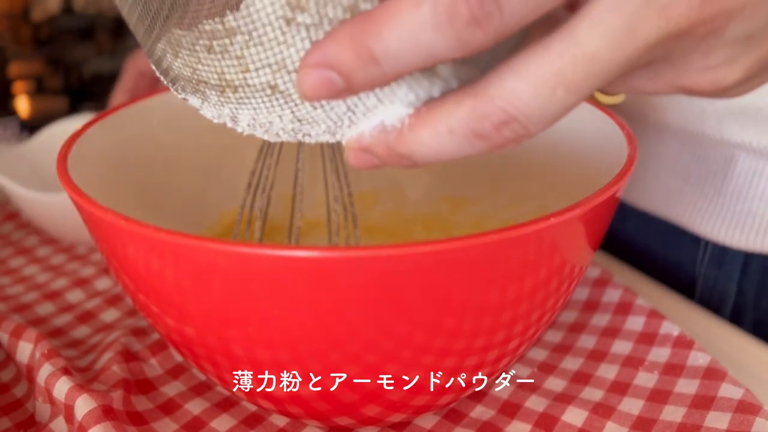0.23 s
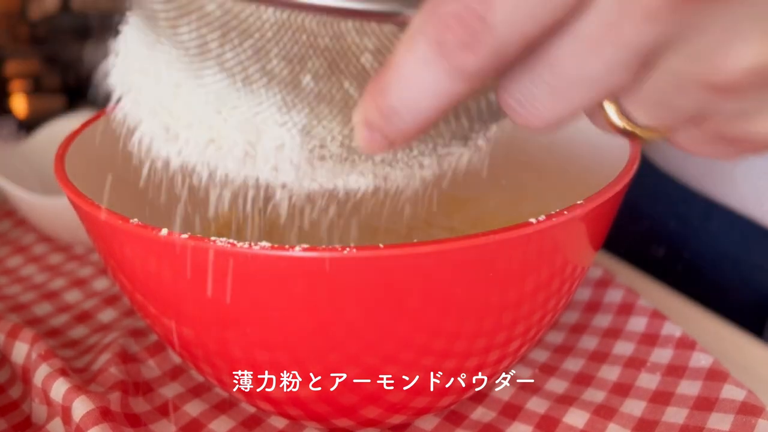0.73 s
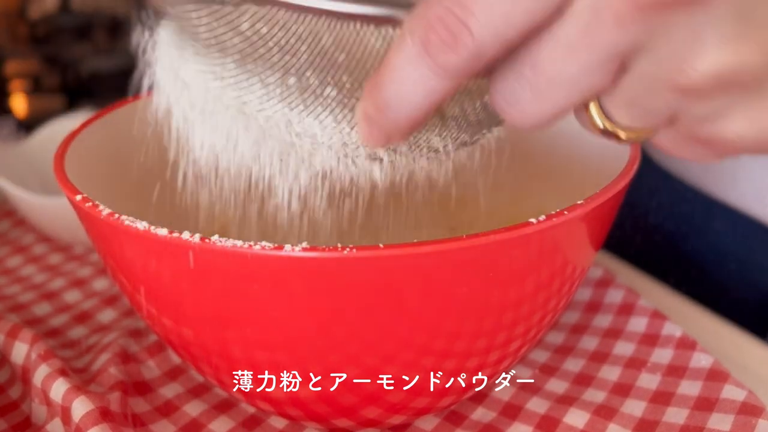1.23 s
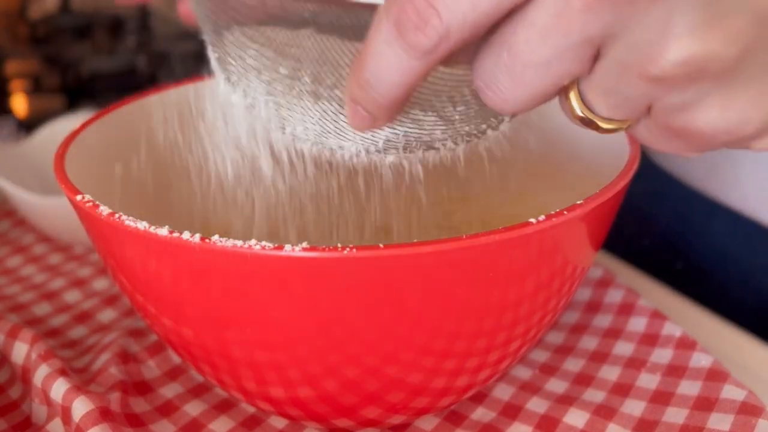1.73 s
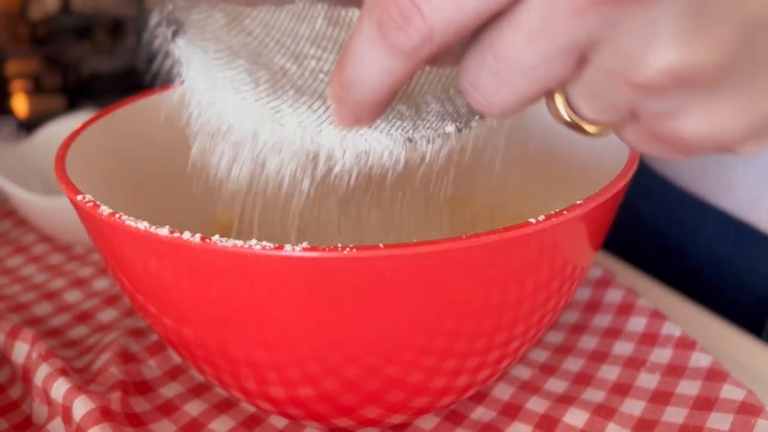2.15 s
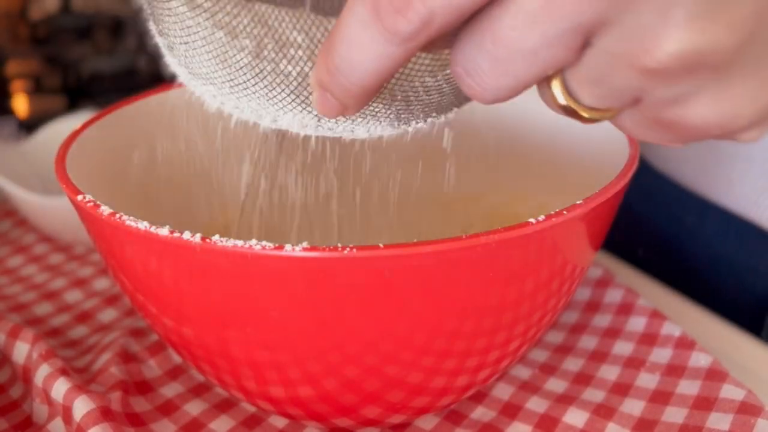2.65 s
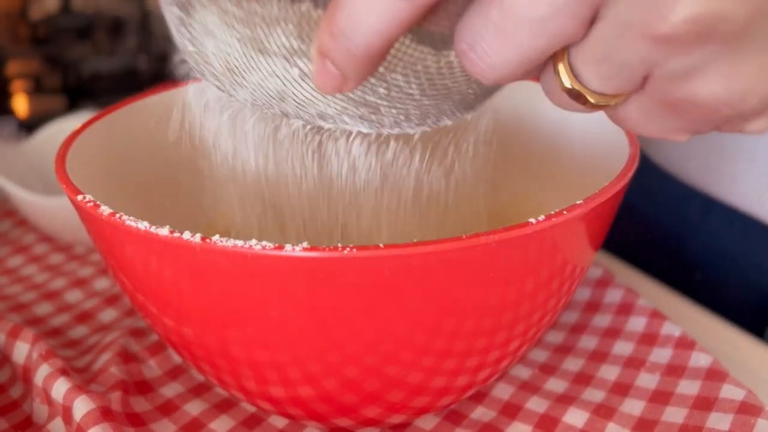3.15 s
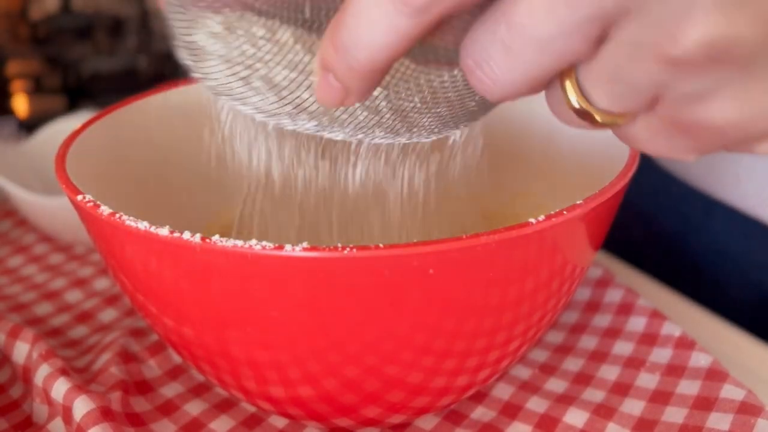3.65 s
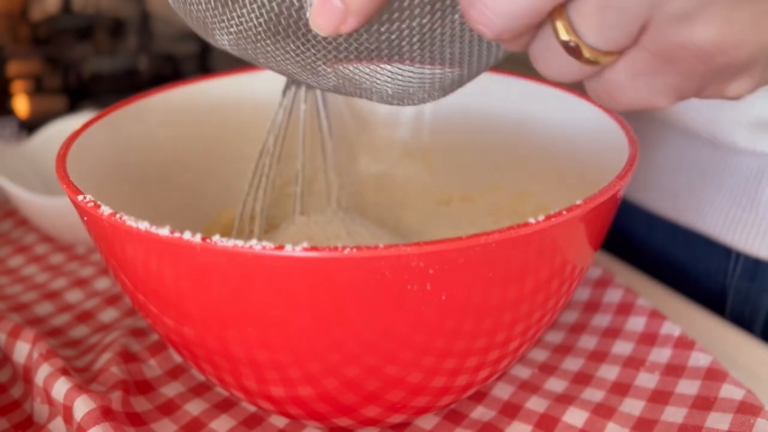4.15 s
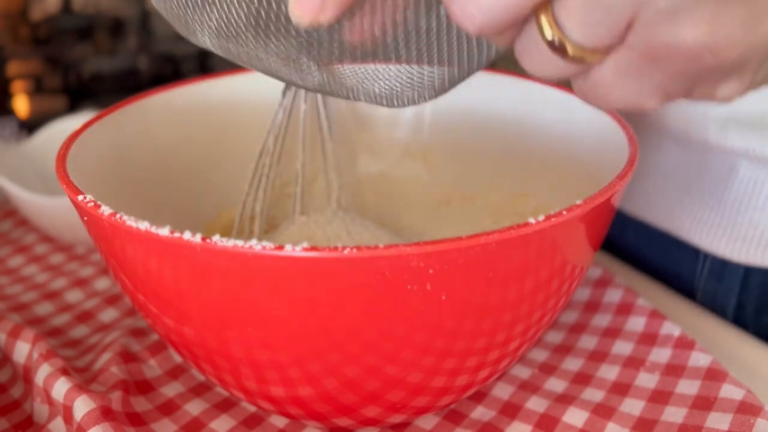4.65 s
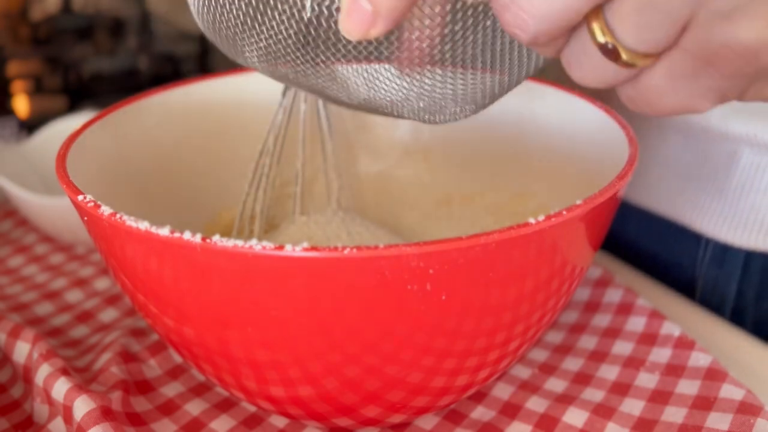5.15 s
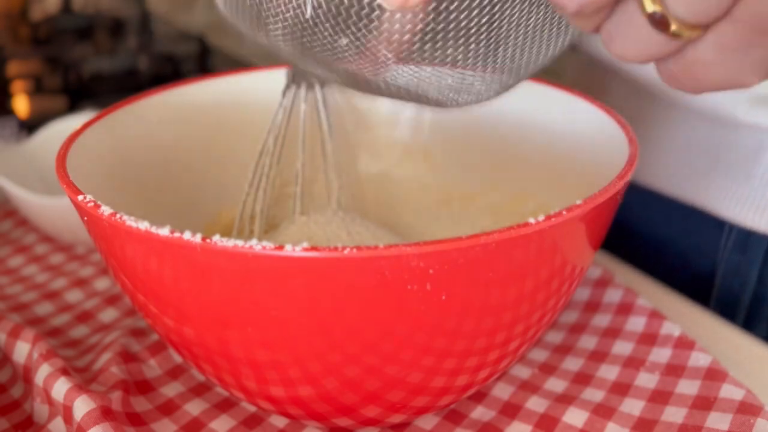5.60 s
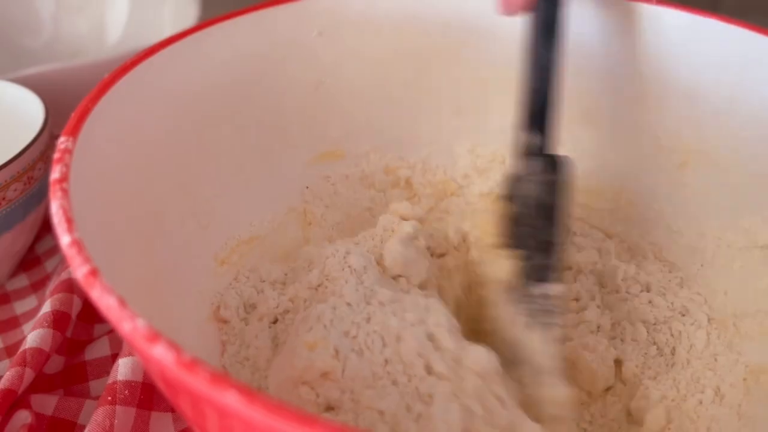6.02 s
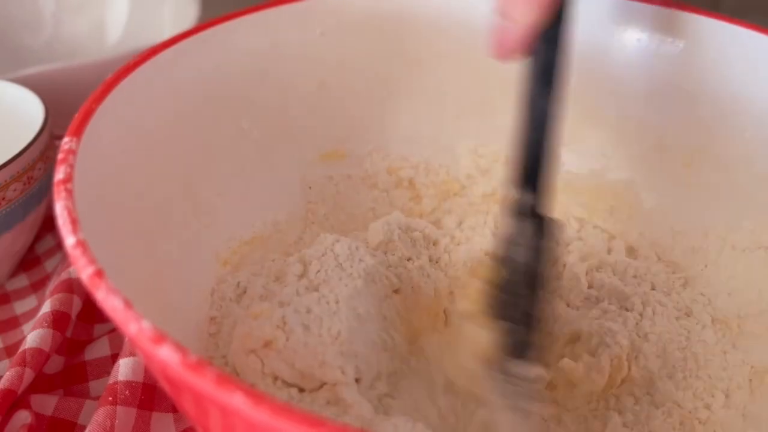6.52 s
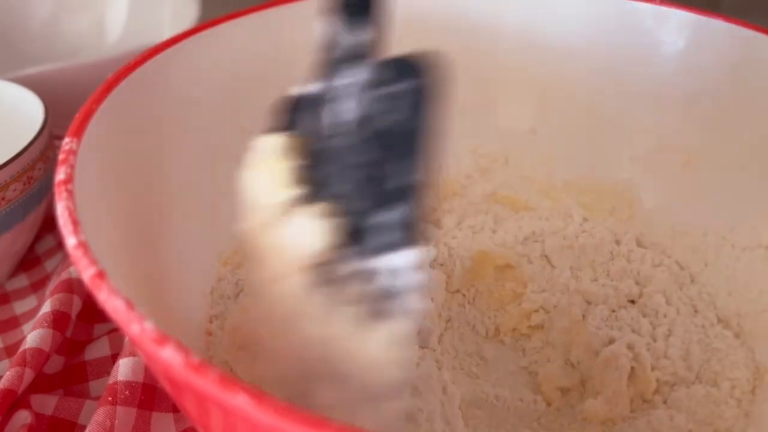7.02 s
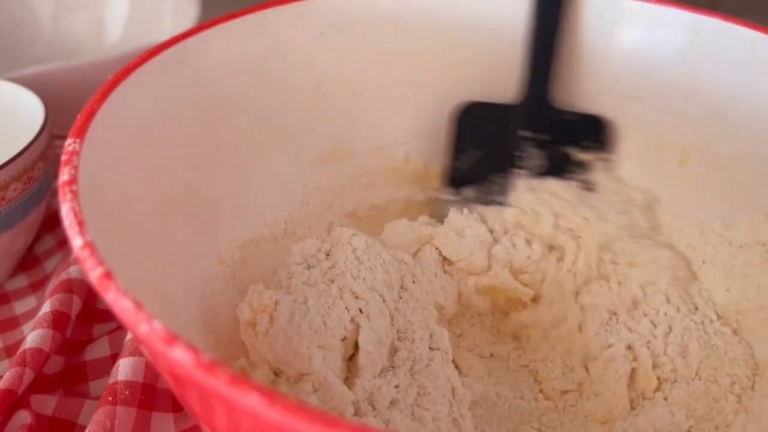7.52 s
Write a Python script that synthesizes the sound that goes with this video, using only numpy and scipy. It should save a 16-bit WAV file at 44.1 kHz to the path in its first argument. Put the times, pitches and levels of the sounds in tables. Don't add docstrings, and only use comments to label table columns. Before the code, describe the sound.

Close, fairly dry stereo sound in a home kitchen with faint motor hum. First a dull table thud, then quick regular sieve taps, crisp and papery with falling flour. The taps give way to sparse rubbing swishes, tiny ticks and increasingly hard metallic knocks. The scene then switches suddenly to a noisier one: a spatula pushes thick batter in soft thumping strokes, then scrapes long and gritty along the bowl.

```python
import sys
import numpy as np
from scipy import signal
from scipy.fft import rfft, irfft, next_fast_len
from scipy.io import wavfile
from scipy.ndimage import uniform_filter1d

SR = 44100
rng = np.random.default_rng(int(sys.argv[2]) if len(sys.argv) > 2 else 0)


def digitize_waveform(pressure):
    field = np.atleast_2d(pressure).T
    bounded = np.clip(field, -1, 1)
    quanta = np.round(bounded * 32767).astype(np.int16)
    wavfile.write(sys.argv[1], SR, quanta)


def convert_level_to_amplitude(level_db):
    exponent = np.asarray(level_db, float) / 20
    return 10 ** exponent


N = 342392
TIME = np.arange(N) / SR
SIZE = next_fast_len(N + SR // 4)
BINS_HZ = np.fft.rfftfreq(SIZE, 1 / SR)
EMPTIED_S, CUT_S = 4.27, 5.892


def rms_one(x):
    return x / np.sqrt(np.mean(x ** 2) + 1e-20)


def in_time(rows):
    s, *columns = np.transpose(rows)
    return [np.interp(TIME, s, c) for c in columns]


def at_bins(points):
    hz, value = np.transpose(points)
    return np.interp(np.log(BINS_HZ + 1), np.log(hz + 1), value)


def band_pass(x, order, low_hz, high_hz):
    return signal.sosfilt(signal.butter(order, [low_hz, high_hz], "band", fs=SR, output="sos"), x)


def grains(spectrum, spread_db):
    sizes = convert_level_to_amplitude(spread_db * np.minimum(rng.exponential(1, N), 5))
    noise = rng.standard_normal((2, N)) * sizes
    return rms_one(irfft(rfft(noise, SIZE) * convert_level_to_amplitude(at_bins(spectrum)), SIZE)[:, :N])


def drift(rate):
    knots = rng.standard_normal(1400)
    return np.interp(TIME * rate, np.arange(len(knots)), knots)


def tone(hz):
    return np.sin(2 * np.pi * np.cumsum(hz) / SR)


def ring(clicks, hz, t60):
    r, w = convert_level_to_amplitude(-60 / (t60 * SR)), 2 * np.pi * hz / SR
    return signal.lfilter([0, np.sin(w)], [1, -2 * r * np.cos(w), r * r], clicks + 1e-18)


def moving_resonance(x, centre_hz, width_hz):
    out, state, r = np.zeros_like(x), np.zeros((2, 2)), np.exp(-np.pi * width_hz / SR)
    for i in range(int(CUT_S * SR), N, 128):
        a = [1, -2 * r * np.cos(2 * np.pi * centre_hz[i] / SR), r * r]
        out[:, i:i + 128], state = signal.lfilter([1, 0, -1], a, x[:, i:i + 128], zi=state)
    return out / np.std(out[:, int(CUT_S * SR):])


def swells(rows):
    out = np.zeros(N)
    for s, ms, db in rows:
        near = slice(max(round((s - ms / 1000) * SR), 0), round((s + ms / 1000) * SR))
        out[near] += convert_level_to_amplitude(db) * np.exp(-.5 * ((TIME[near] - s) / (ms / 4000)) ** 2)
    return out


def evened(x):
    return x / np.sqrt(uniform_filter1d(np.mean(x ** 2, axis=0), size=160) + .1)


def kitchen(x, t60, wet_db, dull_hz):
    t = np.arange(int(.4 * SR)) / SR
    tails = rng.standard_normal((2, len(t))) * convert_level_to_amplitude(-60 * t / t60) * (t > .003)
    tails = band_pass(tails, 2, 70, dull_hz)
    wet = signal.fftconvolve(x[None], tails / np.sqrt(np.sum(tails[0] ** 2)), axes=1)[:, :N]
    return x * [[1], [0]] + convert_level_to_amplitude(wet_db) * wet


# [t/s, level/dB]
THROB = [(0.45, -58.5), (0.65, -55), (0.73, -68), (1.2, -56), (2.06, -71), (2.26, -51.5), (2.46, -61),
         (2.75, -49.5), (2.83, -65), (3.28, -52), (5.15, -64.5), (5.25, -54), (5.84, -65.5), (5.91, -52),
         (6.33, -45.5), (7.25, -53), (7.64, -46), (7.76, -52)]
# [f/Hz, level/dB per Hz]
DEEP_COLOUR = [(20, -47.5), (35, -15), (52, 37.5), (68, 41), (90, -49)]
UPPER_COLOUR = [(60, -13), (78, -17.5), (86, -9), (95, -2.5), (120, -8.5), (143, -4.5), (165, -10.5),
                (210, -15.5), (280, -15.5), (400, -52)]
DEEP_DB, DEEP_FOLLOWS, DEEP_WANDER_DB = -60, 0.2, 2.5
UPPER_DB, UPPER_FOLLOWS, RUMBLE_LATER_DB = -58, 0.11, 9
HUM_HZ, HUM_DB, HUM_FOLLOWS = 86.5, -59, 1.04


def rumble():
    throb_db = in_time(THROB)[0] + 58
    step_db = RUMBLE_LATER_DB * (TIME > CUT_S)
    deep_db = DEEP_DB + step_db + DEEP_FOLLOWS * throb_db + DEEP_WANDER_DB * drift(6)
    upper_db = UPPER_DB + step_db + UPPER_FOLLOWS * throb_db
    deep = convert_level_to_amplitude(deep_db) * grains(DEEP_COLOUR, spread_db=-6.5)
    upper = convert_level_to_amplitude(upper_db) * grains(UPPER_COLOUR, spread_db=-1.0)
    hum_hz = HUM_HZ + 1.2 * drift(5)
    hum_db = HUM_DB + 3.0 + HUM_FOLLOWS * throb_db + 1.6 * drift(4.9)
    return deep + upper + convert_level_to_amplitude(hum_db) * tone(hum_hz) * [[1], [0]]


# [f/Hz, level/dB per Hz]
AIR_COLOUR = [(200, 1.5), (350, 4.5), (500, -0.5), (1000, -1), (1720, -7), (1950, -12), (3900, -20.5),
              (5500, -32), (6500, -65), (7800, -18), (9500, -25.5), (11500, -19.5), (13000, -21),
              (15500, -43)]
AIR_DB, AIR_LATER_DB = -64, -56


def air():
    level_db = np.where(TIME < CUT_S, AIR_DB, AIR_LATER_DB) + 0.2 * drift(3.1)
    return convert_level_to_amplitude(level_db) * grains(AIR_COLOUR, spread_db=3.0)


# [t/s, level/dB]
FAR_SQUEAL = [
    (2.73, -105),
    (2.79, -84.5),
    (3.275, -84.5),
    (3.29, -92),
    (3.75, -93),
    (4.02, -96),
    (4.05, -110),
]
SQUEAL_HZ = 3195


def squeal():
    (level_db,) = in_time(FAR_SQUEAL)
    waver_hz, flicker_db = 30 * drift(170), 3.6 * drift(70)
    return convert_level_to_amplitude(level_db + 9.0 + flicker_db) * tone(SQUEAL_HZ + waver_hz)


def background():
    return rumble() + air() + squeal()


# [t/s, level/dB, upper modes level/dB]
KNOCKS = [
    (0.0922, -26.5, 11.5),
    (0.0982, -20, 8),
    (0.1048, -12, 3),
    (0.117, -17, -1),
    (0.282, -17, -30.5),
]
# [f/Hz, level/dB, t60/s]
TABLE_MODES = [(59, -5, 0.35), (95, 6.5, 0.044), (131, -19, 0.52), (222, -12, 0.052), (278, -17, 0.27),
               (323.3, -6.5, 0.097), (434, -32, 0.14), (521, -22, 0.18), (602, -12.5, 0.071),
               (790, -15, 0.091), (958, -24, 0.1), (1240, -31, 0.086), (1540, -15, 0.026)]
ROOM_DB, KNOCK_RIGHT = -27, 0.45
SETTLE_S, SETTLE_DB = 0.135, -20


def knock():
    rows, out = np.array(KNOCKS), np.zeros(N)
    at = np.round(rows[:, 0] * SR).astype(int)
    settled = convert_level_to_amplitude(SETTLE_DB * np.clip((TIME - SETTLE_S) / 0.0074, 0, 1))
    for hz, level_db, t60 in TABLE_MODES:
        clicks = np.zeros(N)
        clicks_db = rows[:, 1] + level_db - 5 + rows[:, 2] * (hz > 70)
        clicks[at] = convert_level_to_amplitude(clicks_db) * rng.normal(1, .2, len(at))
        out += ring(clicks, hz, t60) * (settled if hz > 200 else 1)
    out = band_pass(out, 4, 50, 1900)
    after = np.maximum(TIME - rows[0, 0], 0)
    clatter = grains([(400, -7.5), (1200, -8.5), (2000, -16.5), (3600, -14.5), (5000, -23),
                      (9000, -36.0), (12000, -62)], spread_db=2)[0]
    out += convert_level_to_amplitude(-35.5) * clatter * np.minimum(after / 0.0019, 1) * np.exp(-after / 0.0071)
    wash = grains([(150, -3), (300, 5), (700, -13), (1500, -20.5), (2300, -36.0),
                   (3000, -37), (6000, -61)], spread_db=3.5)
    wash *= convert_level_to_amplitude(-24.0 - 60 * after / 0.26) * (1 - np.exp(-after / 0.00077))
    lean = KNOCK_RIGHT * ring(out, 330, 0.025) / 60 * [[0], [1]]
    return kitchen(out, t60=0.55, wet_db=ROOM_DB, dull_hz=2400) - lean + wash


# [t/s, level/dB, f/Hz]
BUMPS = [(5.906, -36, 72), (6.098, -31, 110), (6.105, -36.5, 199), (6.113, -52, 332), (6.14, -30, 55.4),
         (6.169, -46, 89.5), (6.216, -39, 72), (6.602, -43, 178), (6.642, -32, 53.7), (7.067, -27.5, 59),
         (7.46, -41, 57.4)]


def bowl_rocks():
    bumps = sum(ring(convert_level_to_amplitude(db) * (np.arange(N) == round(s * SR)), hz, 16 / hz) for s, db, hz in BUMPS)
    return band_pass(bumps, 2, 44, 420) * [[1], [0]]


# [f/Hz, width f/Hz, level/dB]
WALL_MODES = [(2050, 200, -7), (2277, 150, 0), (2500, 130, -3), (3230, 400, -6)]
# [multiple of edge f, width f/Hz, level/dB]
OVERTONES = [(1.5, 300, -10.5), (2.1, 500, -8)]
# [middle t/s, length t/ms, level/dB]
SQUEAK = [
    (7.085, 56, -58),
    (7.135, 35, -57),
    (7.172, 30, -53),
]
# [t/s, f/Hz, level/dB]
LIFT = [
    (7.36, 3300, -90),
    (7.4, 3400, -60),
    (7.485, 4130, -52),
    (7.51, 4300, -90),
]
EDGE_UNDER_DRAG_DB = -19


def blade(press, folding, centre_hz):
    grit = grains([(1500, -33.0), (2000, 5.5), (4000, 11.5), (6000, -8)], spread_db=3.5)
    wall = sum(convert_level_to_amplitude(db) * rms_one(ring(grit, hz, 2.5 / width_hz)) for hz, width_hz, db in WALL_MODES)
    wall = wall + sum(convert_level_to_amplitude(db) * moving_resonance(grit, k * centre_hz, width_hz)
                      for k, width_hz, db in OVERTONES)
    edge = rms_one(moving_resonance(grit, centre_hz, width_hz=480) + .6 * wall + .6 * grit)
    chatter = convert_level_to_amplitude(.8 * drift(45) - 0.5)
    squeak = swells(SQUEAK) * moving_resonance(grit, centre_hz, width_hz=110)
    lift_hz, lift_db = in_time(LIFT)
    squeak += convert_level_to_amplitude(lift_db) * moving_resonance(grit, lift_hz, width_hz=840)
    return (convert_level_to_amplitude(EDGE_UNDER_DRAG_DB) * folding + press) * chatter * edge + squeak


# [middle t/s, length t/ms, batter drag level/dB, dry flour level/dB]
FOLDS = [(5.892, 6.4, -76, -78), (5.99, 360, -51.5, -68.5), (6.118, 84, -43.5, -60), (6.19, 160, -57, -84),
         (6.37, 280, -48, -66.5), (6.51, 66, -48, -74), (6.631, 93, -49.5, -67), (6.71, 144, -49, -61.5),
         (6.97, 160, -76, -97), (7.059, 36, -64, -52.5), (7.55, 49, -73, -58), (7.735, 90, -75, -57.5)]
# [t/s, blade pressure level/dB, batter load level/dB, ploughed flour level/dB]
SCRAPE = [(7.03, -99, -79, -81), (7.082, -68, -52, -55), (7.11, -78, -55, -59), (7.186, -58, -61, -50.5),
          (7.194, -45, -50, -48), (7.23, -46.5, -50, -54), (7.268, -42.5, -50, -50.5),
          (7.358, -45.5, -45.5, -47), (7.45, -55.5, -45, -52.5), (7.5, -60, -41.5, -52.5),
          (7.582, -56.5, -42.5, -50.5), (7.69, -58.5, -42, -54), (7.703, -56, -35, -52.5),
          (7.75, -60, -48.5, -55.5), (7.76, -52, -39.5, -56)]
# [t/s, blade edge f/Hz, batter pocket f/Hz]
GLIDES = [(7.0, 2540, 1050), (7.17, 2620, 990), (7.195, 2500, 935), (7.27, 2300, 1000), (7.31, 2480, 1150),
          (7.35, 2860, 1310), (7.43, 3070, 1300), (7.49, 3100, 1460), (7.52, 2870, 1790), (7.6, 3030, 2000),
          (7.66, 2920, 2050), (7.76, 2800, 2050)]
# [f/Hz, level/dB per Hz]
BATTER_COLOUR = [(150, 11), (300, 6), (600, 9.5), (1200, 4), (1800, 0), (3000, -11), (6000, -40)]
DRY_COLOUR = [(2500, 5.5), (4000, 6), (5500, 5), (7000, 8.5), (9000, 7.5), (11000, 6.5), (13000, -1.5),
              (14000, -27), (15300, -33), (17000, -45)]


def spatula():
    press_db, load_db, flour_db = in_time(SCRAPE)
    centre_hz, pocket_hz = in_time(GLIDES)
    scraping, folds = TIME > SCRAPE[0][0], np.array(FOLDS)
    folding = swells(folds[:, :3])
    batter = grains(BATTER_COLOUR, spread_db=2.5)
    pocket = moving_resonance(batter, pocket_hz, width_hz=770) * (TIME > GLIDES[0][0])
    batter = batter + 1.07 * pocket
    drag = (folding + scraping * convert_level_to_amplitude(load_db)) * convert_level_to_amplitude(-7.5 + 1.34 * drift(25)) * batter
    ploughed = swells(folds[:, [0, 1, 3]]) + scraping * convert_level_to_amplitude(flour_db)
    unsteady = convert_level_to_amplitude(1.5 + 2.5 * drift(60) + .5 * drift(13))
    dry_flour = ploughed * unsteady * grains(DRY_COLOUR, spread_db=0.5)
    edge = blade(scraping * convert_level_to_amplitude(press_db), folding, centre_hz)
    return (drag + edge + dry_flour + bowl_rocks()) * (TIME >= CUT_S)


# [middle t/s, length t/ms, level/dB, f/Hz]
MURMURS = [
    (4.45, 80, -88, 4500),
    (5.07, 90, -76, 4400),
    (5.325, 48, -63, 4530),
    (5.51, 35, -64, 4540),
    (5.53, 45, -71, 3920),
]
MURMUR_T60_S = .009


def murmurs():
    out = np.zeros(N)
    for s, ms, db, hz in MURMURS:
        near = slice(round((s - .15) * SR), round((s + .15) * SR))
        note = rng.standard_normal(near.stop - near.start)
        note = ring(ring(note, hz, MURMUR_T60_S), hz, MURMUR_T60_S)
        out[near] += swells([(s, ms, db)])[near] * rms_one(note)
    return out


# [t/s, peak level/dB, palm thud level/dB, level/dB of the swish before it, swell t/ms]
TAPS = [(0.561, -28, -62, -91, 3.2), (0.7579, -26.5, -47.5, -68, 3), (0.925, -31.5, -47, -74, 3.5),
        (1.103, -35, -54, -69, 2.9), (1.261, -44, -59, -71, 2), (1.4057, -35.5, -50.5, -68, 4.7),
        (1.557, -42, -63, -69, 2.9), (1.7055, -50, -55, -75, 2.8), (1.8493, -50.5, -60, -72, 4.9),
        (2.0023, -39, -56, -83, 2.4), (2.1596, -35.5, -58, -68, 3.6), (2.3296, -32, -53, -72.5, 2.6),
        (2.4994, -30.5, -48.5, -70, 2.4), (2.675, -22.5, -48.5, -79, 2.8), (2.851, -34.5, -50, -71.5, 3.9),
        (3.032, -31.5, -57, -77, 2.6), (3.1926, -33, -56, -75, 3.2), (3.3705, -31, -55, -75, 3.1),
        (3.532, -33.5, -55.5, -75, 3.8), (3.707, -33, -64, -72, 3.9), (3.867, -42.5, -75, -87, 4.8)]
# [t/s, peak level/dB, palm thud level/dB, rim ring level/dB, swell t/ms]
RAPS = [
    (4.47, -45, -63, -56.5, 4.2),
    (4.689, -31, -75, -73, 5.8),
    (4.985, -26.5, -80, -59, 2.8),
    (5.2295, -25.5, -62, -52, 3.8),
    (5.316, -38, -75, -65, 8.4),
    (5.4389, -20.5, -60, -62, 2.7),
    (5.511, -42.5, -77, -56, 2.9),
    (5.6178, -15, -78, -33, 3.5),
    (5.713, -56, -75, -54, 3.6),
    (5.796, -14.5, -51.5, -35.5, 3.5),
]
# [t/s, peak level/dB]
TICKS = [(1.1966, -49), (1.3482, -47), (1.498, -46.5), (1.646, -53), (1.785, -47), (1.936, -52),
         (2.4373, -56), (2.627, -52), (2.985, -54), (3.3295, -45.5), (3.482, -53), (3.6574, -53.5),
         (3.8224, -52), (3.908, -50.5), (4.3386, -41.5), (4.442, -60), (4.552, -49), (4.5876, -42.5),
         (4.8867, -41), (5.1293, -37.5)]
# [t/s, peak level/dB]
CRUMBS = [(0.6923, -56), (0.7057, -62), (0.722, -60), (0.8634, -58), (0.8739, -55), (0.9871, -56),
          (1.031, -50), (1.0579, -51), (1.254, -45), (1.3657, -52), (1.842, -53), (2.1046, -51),
          (2.2807, -58), (2.4179, -58), (2.6508, -52), (2.8075, -62), (3.1477, -71), (3.238, -61),
          (2.847, -49), (3.365, -41), (3.703, -46), (3.716, -47), (3.992, -53), (4.2872, -60),
          (4.3072, -64), (4.3122, -65), (4.5317, -76), (4.5442, -49), (4.594, -45), (4.866, -46),
          (4.883, -51), (4.9657, -73), (4.981, -40.5), (5.226, -37), (5.3044, -60), (5.571, -52),
          (5.645, -40), (5.6887, -42), (5.8876, -51)]
USUAL_DB = -35
SHED_DB, SHED_FOLLOWS, RAP_SHED_DB, RAP_SHED_FOLLOWS = -53, 0.59, -50, 0.59
RIM_DB, RIM_FOLLOWS = -64.5, 0.79
TICK_MS, TICK_SHED_DB = 3, -68.5
CRUMB_MS, CRUMB_SHED_DB = 2, -19


def blows():
    rows = []
    for s, db, thud_db, _, ms in TAPS:
        harder_db = db - USUAL_DB
        shed_db, rim_db = SHED_DB + SHED_FOLLOWS * harder_db, RIM_DB + RIM_FOLLOWS * harder_db
        rows.append((s, db, ms, shed_db, thud_db, rim_db))
    for s, db, thud_db, rim_db, ms in RAPS:
        shed_db = RAP_SHED_DB + RAP_SHED_FOLLOWS * (db - USUAL_DB)
        rows.append((s, db, ms, shed_db, thud_db, rim_db))
    ticks = [(s, db, TICK_MS, TICK_SHED_DB, db - 43, db - 32) for s, db in TICKS]
    crumbs = [(s, db, CRUMB_MS, db + CRUMB_SHED_DB, db - 28, db - 39) for s, db in CRUMBS]
    return rows + ticks + crumbs


RING_ON, RING_ON_S = .15, .045


def strikes():
    burst, shed, thud, rim = np.zeros((4, N))
    lead = round(.03 * SR)
    t = np.arange(-lead, int(.14 * SR)) / SR
    for s, peak_db, burst_ms, shed_db, thud_db, rim_db in blows():
        at = round((s - .0015) * SR)
        span = slice(at - lead, at - lead + len(t))
        u = np.maximum(t, 0) / (np.clip(burst_ms, .5, 12) / 1000)
        swell = u ** 3 * np.exp(3 - 3 * u)
        burst[span] += convert_level_to_amplitude(peak_db - 9.0) * swell
        ahead = np.exp((t - .003) / 0.0027)
        falling = 0.37 * np.exp(-t / 0.026) + 0.27 * np.exp(-t / 0.031)
        shed[span] += convert_level_to_amplitude(shed_db) * np.where(t < .003, ahead, falling)
        thud[at + round(.002 * SR)] += convert_level_to_amplitude(thud_db + 5.5)
        rim[span] += convert_level_to_amplitude(rim_db - 25.5) * (swell + RING_ON * (t > 0) * np.exp(-t / RING_ON_S))
    return burst, shed, thud, rim


# [middle t/s, length t/ms, level/dB]
RUBS = [
    (4.326, 107, -64.5),
    (4.44, 61, -64.5),
    (4.547, 57, -61),
    (4.8, 300, -64.5),
    (5.06, 120, -62.5),
    (5.126, 40, -57.5),
    (5.31, 74, -68),
    (5.52, 27, -57),
    (5.713, 19, -53.5),
]
SWING_AHEAD_S, SWING_MS = 0.034, 80


def swishes():
    return swells([(s - SWING_AHEAD_S, SWING_MS, db) for s, _, _, db, _ in TAPS] + RUBS)


# [t/s, level/dB]
SLIDE = [(0.45, -98), (0.7, -81), (0.92, -85), (1.9, -82), (3.6, -75), (3.99, -75), (4.24, -91),
         (4.33, -56), (4.92, -101), (5.16, -58), (5.5, -93), (5.71, -70), (5.89, -67)]
# [f/Hz, level/dB per Hz]
POWDER_COLOUR = [(2000, -19), (3000, -18), (4000, -22.5), (5000, -7.5), (6000, -5.5), (7000, -4),
                 (8500, -2), (10500, -9), (12000, -7), (13300, -19), (14500, -16.5), (16000, -22)]
MESH_NOTE_HZ, MESH_NOTE_T60_S, MESH_NOTE_FLICKER_DB = 5300, .0025, 3
THINNED = 0.15


def falling_powder(shed):
    (slide_db,) = in_time(SLIDE)
    slide = convert_level_to_amplitude(slide_db - 17.0 + 0.98 * drift(25) + 1.5 * drift(90)) * (TIME > SLIDE[0][0])
    flow = (shed + slide + swishes()) * convert_level_to_amplitude(1.3 * drift(120))
    powder = flow * grains(POWDER_COLOUR, spread_db=1.8)
    powder -= THINNED * (TIME > EMPTIED_S) * band_pass(powder, 1, 3500, 7000)
    powder[0] += murmurs()
    note = ring(powder[0], MESH_NOTE_HZ, MESH_NOTE_T60_S) * (TIME < EMPTIED_S)
    powder[0] += convert_level_to_amplitude(-22.5 + MESH_NOTE_FLICKER_DB * drift(36)) * note
    return powder


# [f/Hz, level/dB, t60/s]
RIM_MODES = [(3900, -12, .012), (4080, -3, .016), (4190, -2, .016), (2350, -21, .012), (5490, -16, .02)]


def frame(thud, rim):
    rim = rim * rng.choice([-1, 1], N) * convert_level_to_amplitude(1.8 * drift(160))
    body = ring(thud, 483, 0.0095) + 0.47 * ring(thud, 557, 0.012) + 0.04 * ring(thud, 1700, 0.0039)
    body = body + sum(convert_level_to_amplitude(db) * ring(rim, hz, t60) for hz, db, t60 in RIM_MODES)
    return kitchen(body, t60=0.23, wet_db=-10.5, dull_hz=5000)


# [f/Hz, level/dB per Hz]
FULL_COLOUR = [(1500, -2), (2500, -72), (3500, -88), (4500, -2.5), (5500, 5.5), (6500, 9), (8000, 10.5),
               (10000, 8), (12000, 10.5), (13500, -6), (15000, -3), (16500, -15)]
EMPTY_COLOUR = [(1500, -32), (2500, -7), (3500, -56), (4200, -5), (5000, -5.5), (6200, 9.5), (7500, 14.5),
                (9000, 13.5), (11000, 12), (13000, 4.5), (15000, -3), (16500, -49)]
MESH_SPREAD = 0.33


def mesh_rattle(burst):
    full, empty = grains(FULL_COLOUR, spread_db=2.5), grains(EMPTY_COLOUR, spread_db=2.5)
    mesh = burst * evened(np.where(TIME < EMPTIED_S, full, empty)) * [[1], [MESH_SPREAD]]
    lows = band_pass(mesh, 2, 1500, 6200)
    return mesh + .5 * drift(42) * lows


def sieve():
    burst, shed, thud, rim = strikes()
    return (mesh_rattle(burst) + falling_powder(shed) + frame(thud, rim)) * (TIME < CUT_S)


# [f/Hz, lead/radians]
LEFT_LEADS = [(0, 0), (340, -.1), (750, 1.8), (1810, -.3), (3700, 1.0), (5000, 0), (5940, -2.3),
              (6550, -3.3), (8440, -5.9), (9560, -6.4), (12200, -9.3), (14000, -9.9), (15700, -12.6)]
# [f/Hz, likeness 0-1]
LIKENESS = [(60, 0.97), (250, 0.81), (500, 0.28), (1200, 0), (2200, 0.63), (4500, 0.32), (8000, 0.95),
            (14000, 0.64)]
# [f/Hz, level/dB]
LEFT_OVER_RIGHT = [(60, .8), (130, 1.1), (300, .3), (600, 1.5), (2000, 1), (4000, -.2), (8000, -.2)]


def scene():
    shared, unshared = rfft(background() + knock() + spatula() + sieve(), SIZE)
    alike = np.clip(at_bins(LIKENESS), 0, 1)
    shared, unshared = shared * np.sqrt((1 + alike) / 2), unshared * np.sqrt((1 - alike) / 2)
    port = convert_level_to_amplitude(at_bins(LEFT_OVER_RIGHT) / 2) * np.exp(.5j * at_bins(LEFT_LEADS))
    return irfft(np.array([(shared + unshared) * port, (shared - unshared) / port]), SIZE)[:, :N]


def top_cut(x):
    return signal.sosfilt(signal.butter(12, 16750, fs=SR, output="sos"), x)


def record(dry):
    return top_cut(dry)


dry = scene()
out = record(dry)
digitize_waveform(out)
```